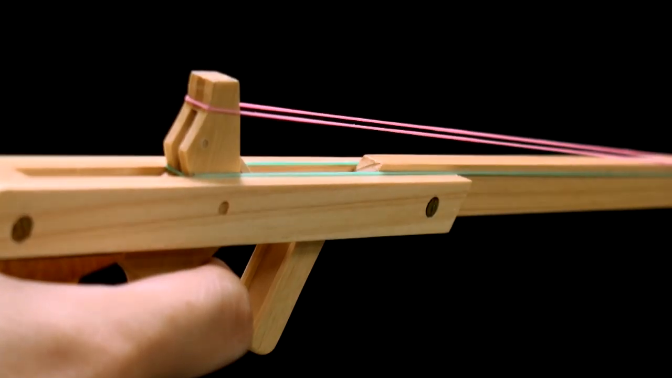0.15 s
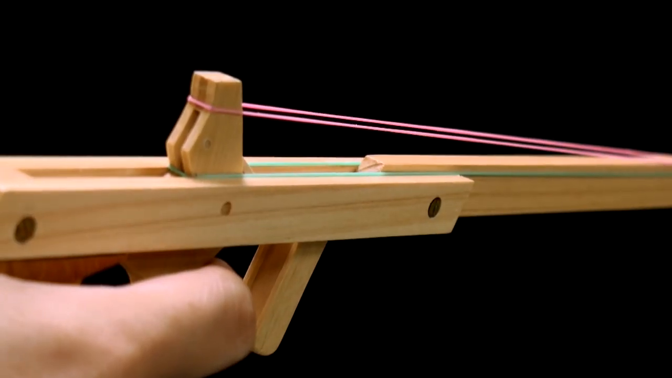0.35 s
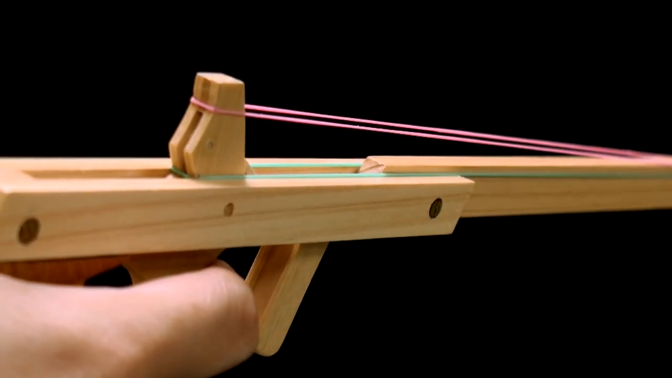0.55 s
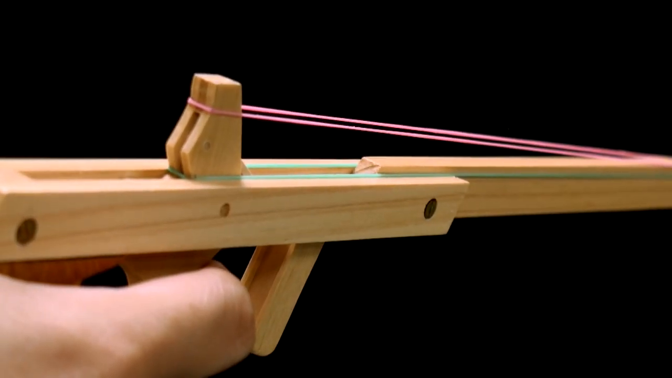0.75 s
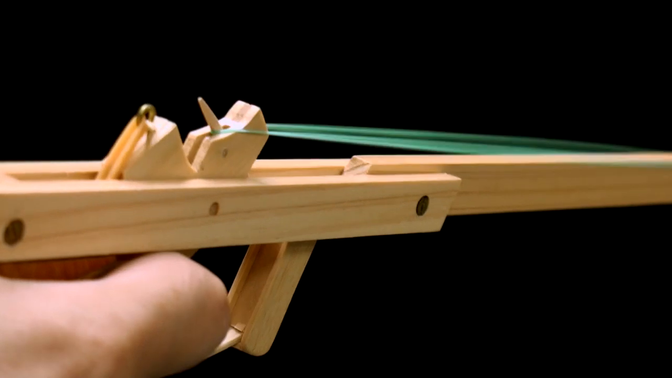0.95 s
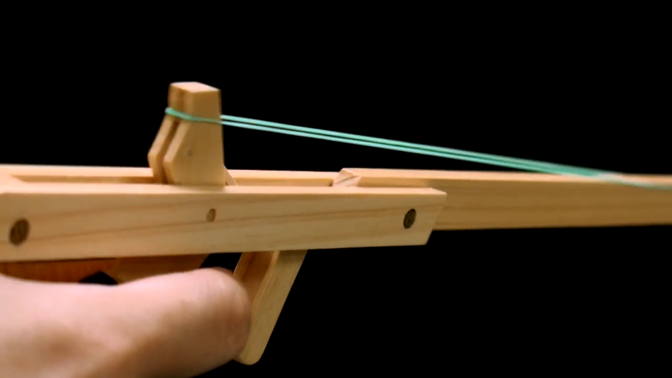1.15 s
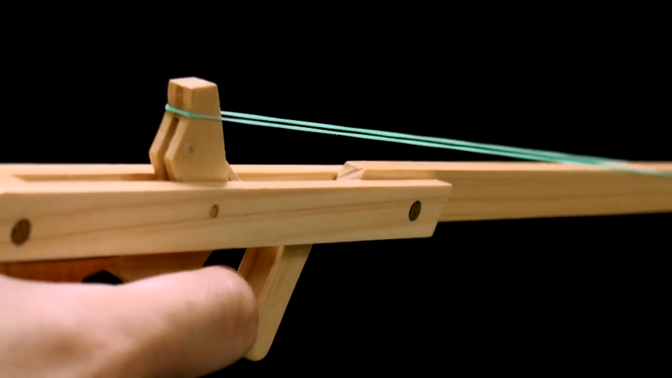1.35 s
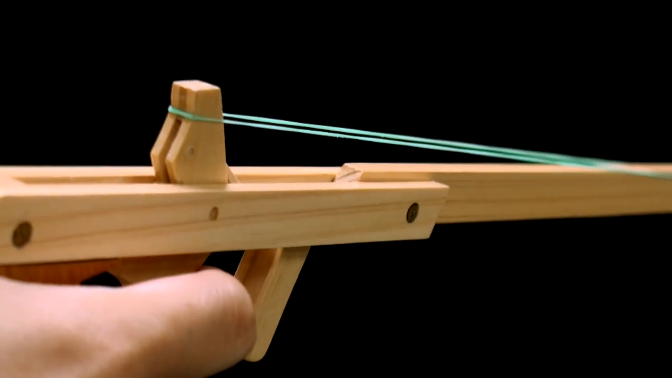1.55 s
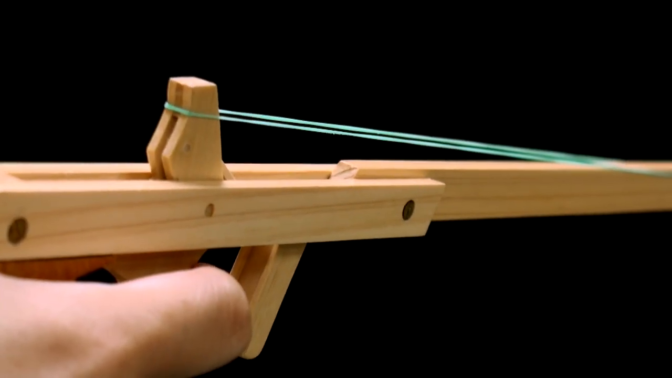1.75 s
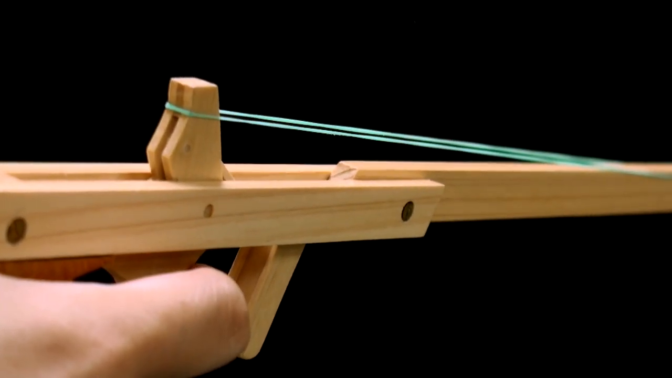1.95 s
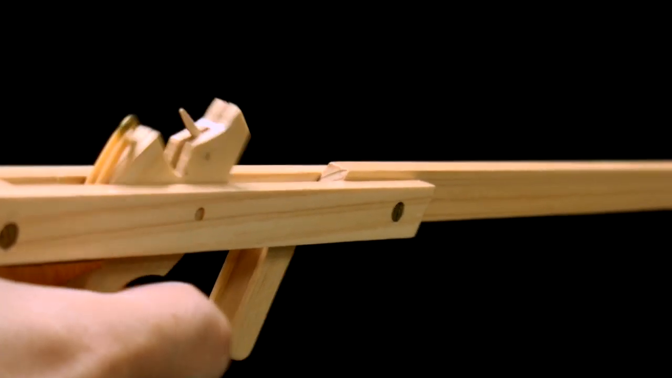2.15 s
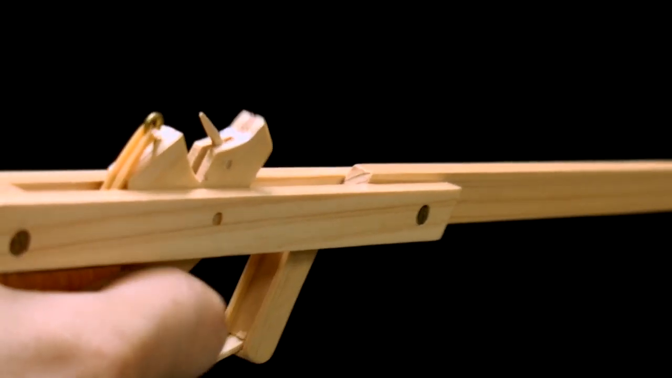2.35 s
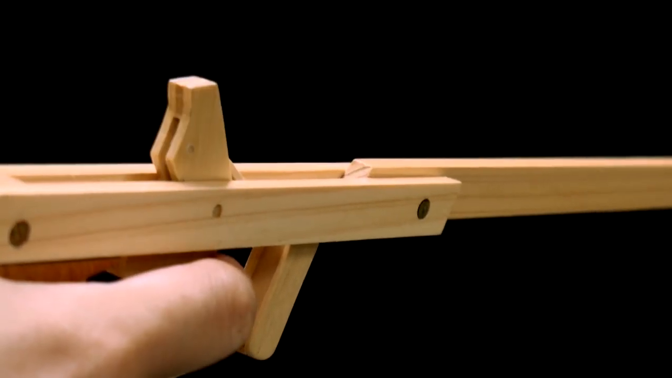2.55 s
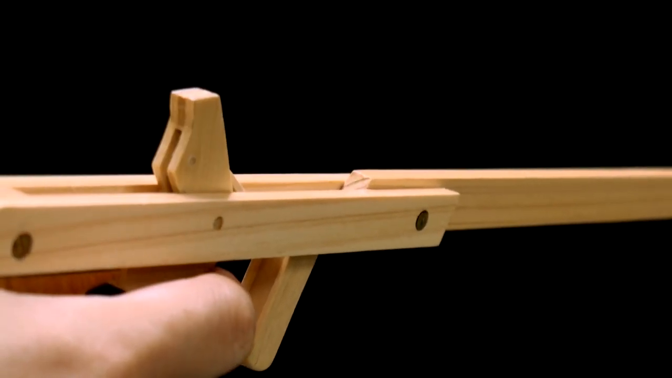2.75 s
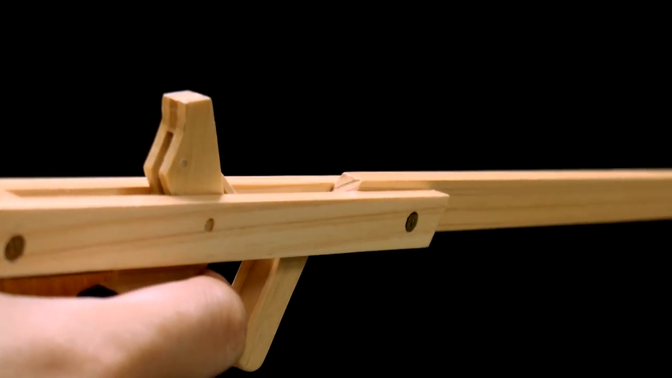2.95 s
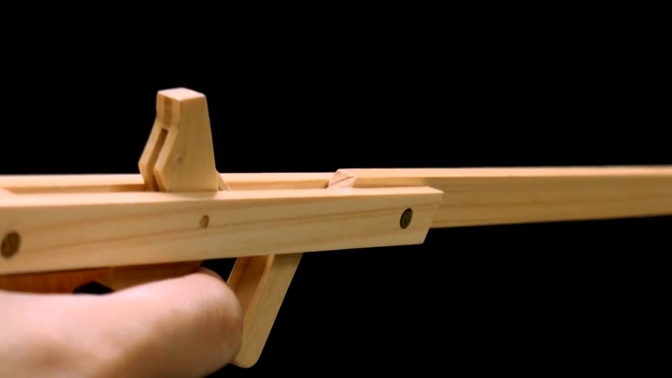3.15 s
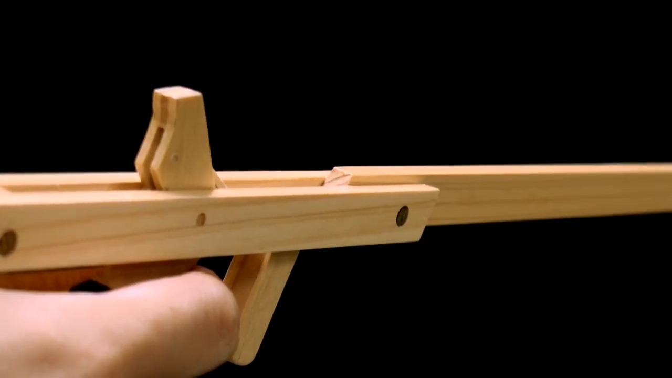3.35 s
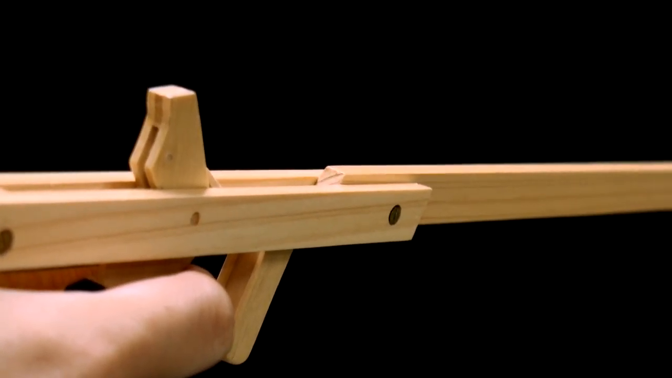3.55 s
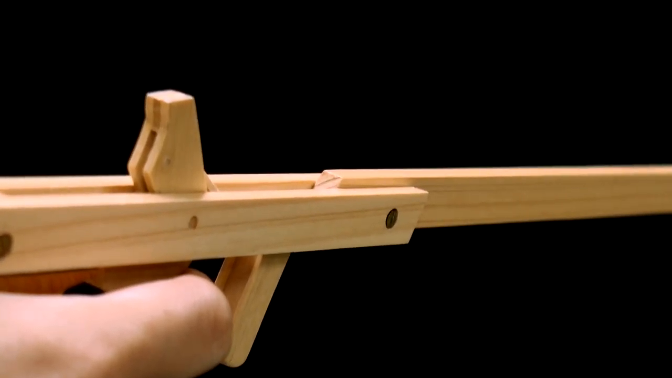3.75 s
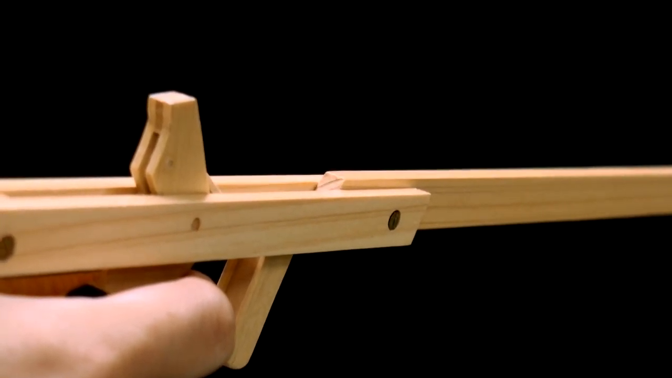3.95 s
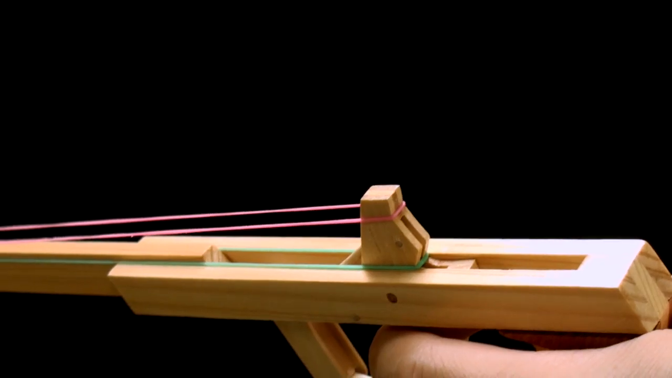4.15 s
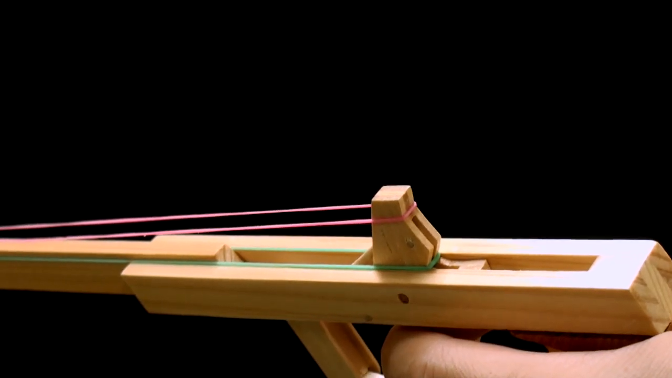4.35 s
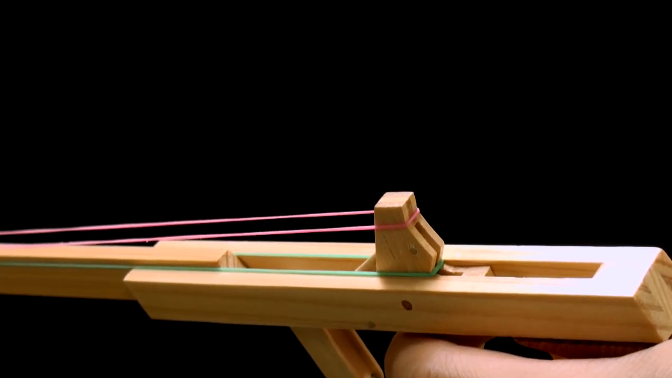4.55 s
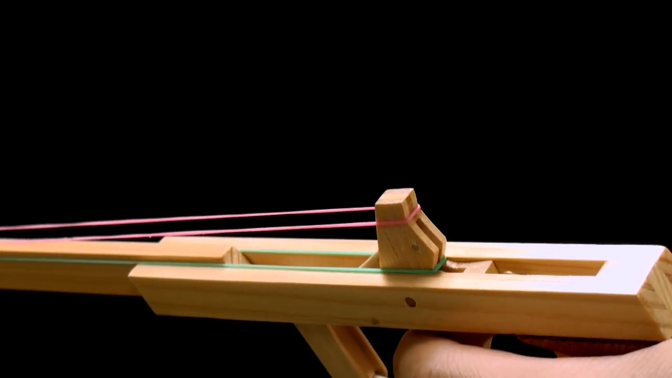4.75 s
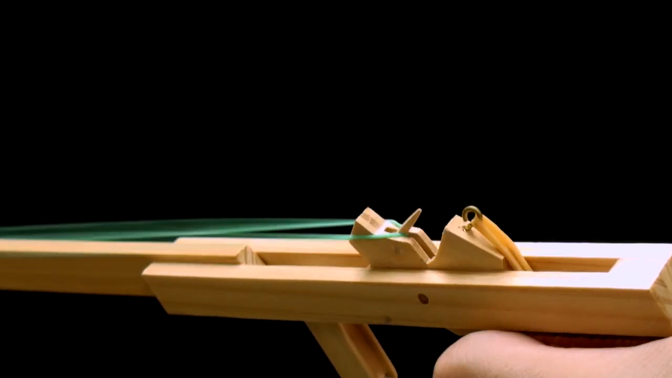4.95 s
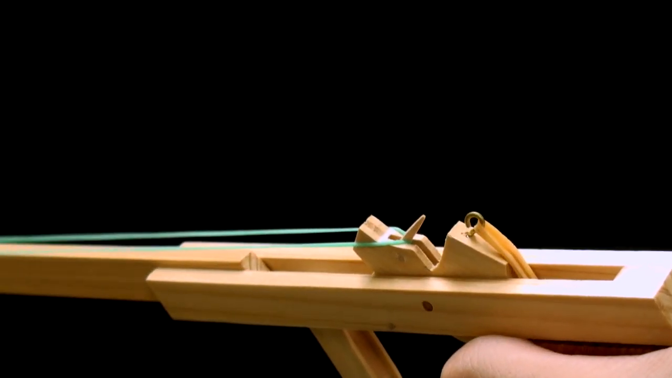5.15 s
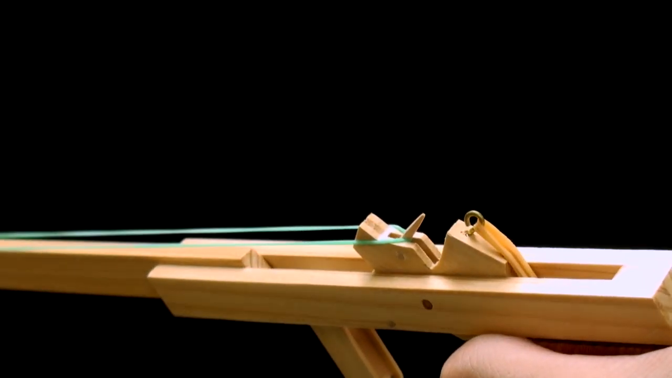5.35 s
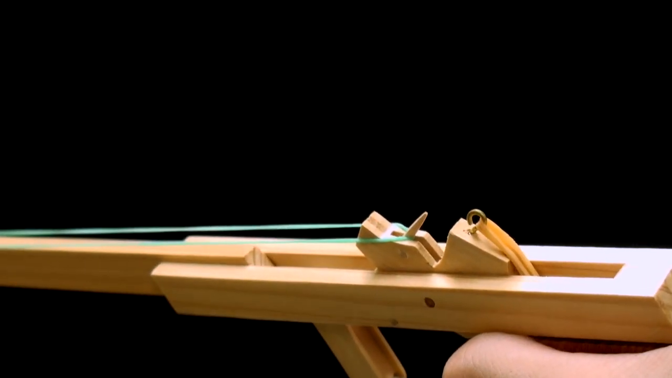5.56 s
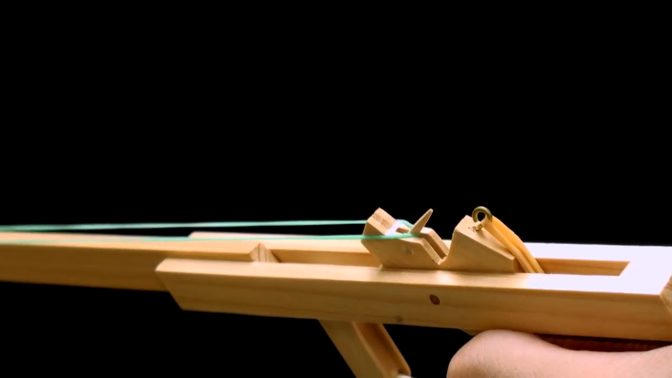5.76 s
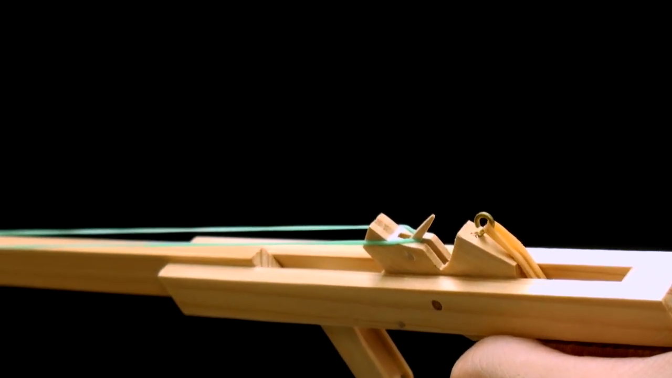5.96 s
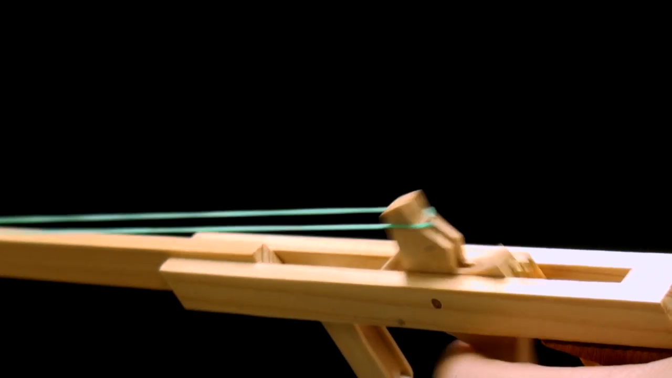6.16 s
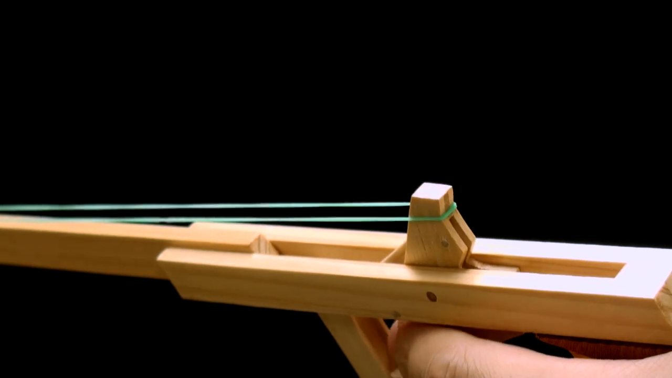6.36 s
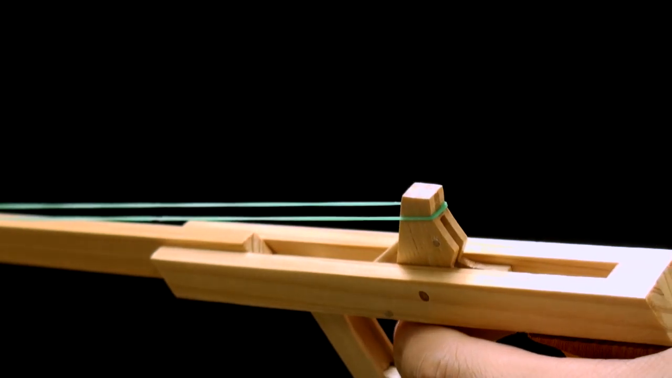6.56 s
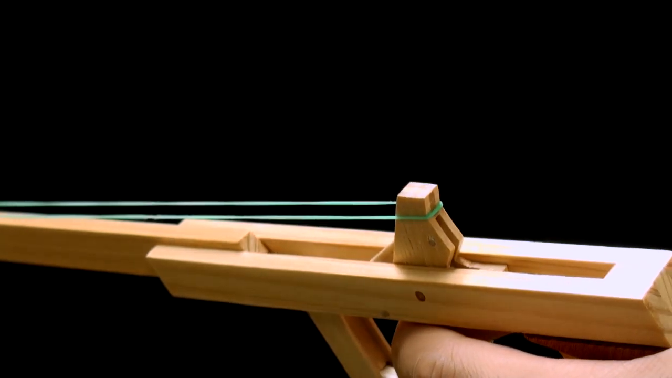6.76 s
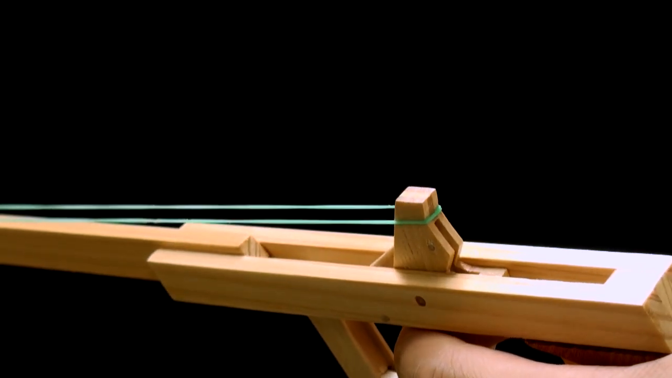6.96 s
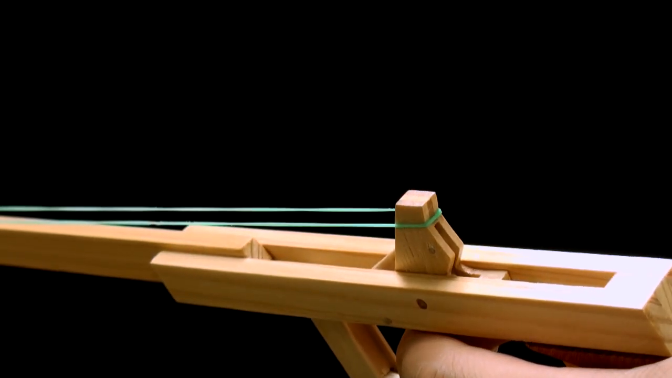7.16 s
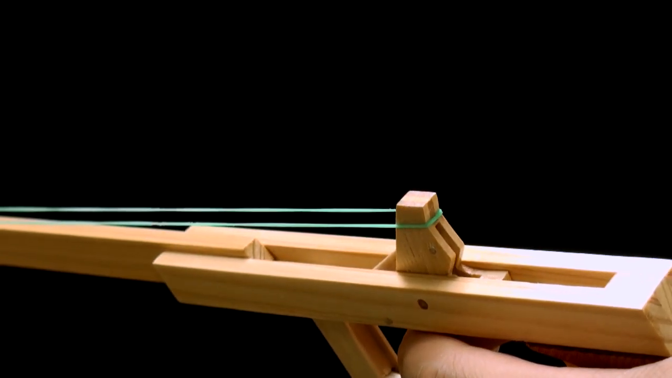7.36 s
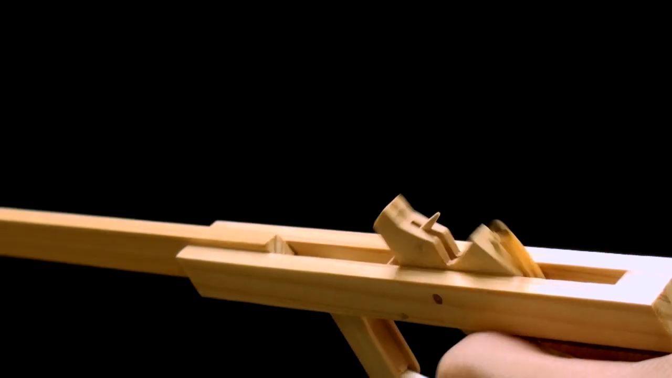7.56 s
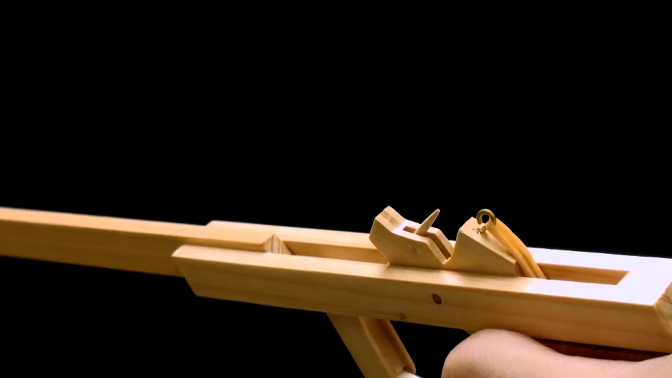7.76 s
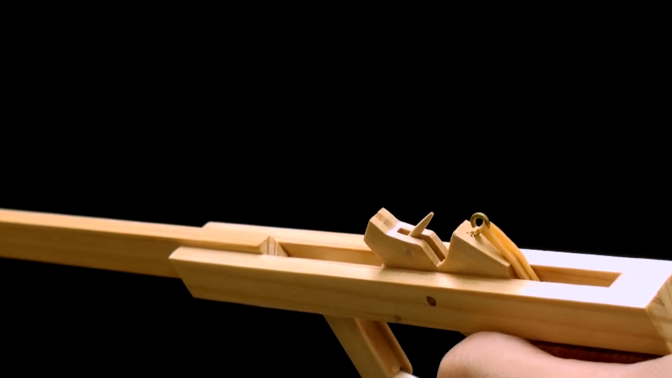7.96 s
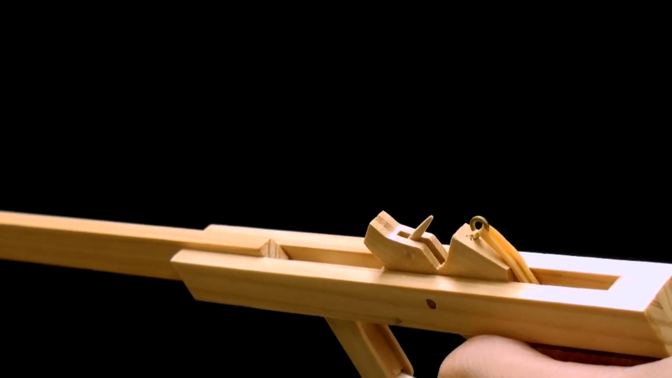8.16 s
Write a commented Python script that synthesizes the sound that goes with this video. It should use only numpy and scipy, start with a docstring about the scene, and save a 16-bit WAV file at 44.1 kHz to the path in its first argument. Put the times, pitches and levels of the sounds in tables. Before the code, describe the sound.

Four hard wooden clacks from a rubber band gun, with light ticks and brief slides, echo shortly over very quiet hiss and insects.

```python
"""A bare room on a summer night: a wooden rubber band gun is fired four times before two microphones.
Trigger and catch slide and tick, the freed band whips along the rail as fading noise, and the hook's slam
rings the modes of the gun. Echoes and a dense tail answer; a quick limiter flattens each slam.
Outside, narrow bands of noise make one chirping cricket and a far chorus of insects.
Beneath lie a hum of four unsteady tones, far traffic as deep noise, and the hiss of the microphones."""
import sys
import numpy as np
from scipy import signal
from scipy.fft import rfft, irfft, next_fast_len
from scipy.io import wavfile
from scipy.ndimage import uniform_filter1d, minimum_filter1d

SR = 44100
rng = np.random.default_rng(int(sys.argv[2]) if len(sys.argv) > 2 else 0)


def dump(signal):
    """Clip the signal to [-1, 1] and save it as 16-bit WAV at the path in sys.argv[1]."""
    limited = np.clip(np.atleast_2d(signal).T, -1, 1)
    pcm = np.round(limited * 32767).astype(np.int16)
    wavfile.write(sys.argv[1], SR, pcm)


N = 362502  # length in samples


def gain_of(db):
    """Turns decibels into an amplitude factor."""
    return 10 ** (np.asarray(db) / 20)


def evened(x):
    """Scales a sound to an rms of one."""
    return x / np.sqrt(np.mean(x ** 2) + 1e-20)


def read(points, hz):
    """Reads a table between its points along a log-frequency axis."""
    point_hz, value = np.transpose(points)
    return np.interp(np.log(hz + 1), np.log(point_hz + 1), value)


def add(mix, start_s, sound):
    """Mixes a sound in at its start time, cut off where the mix ends."""
    part = mix[round(start_s * SR):][:len(sound)]
    part += sound[:len(part)]


def coloured(x, points):
    """Weights the spectrum along the last axis by a table of (pitch_hz, level_db)."""
    length = x.shape[-1]
    size = next_fast_len(length)
    gain = gain_of(read(points, np.fft.rfftfreq(size, 1 / SR)))
    return irfft(rfft(x, size) * gain, size)[..., :length]


def paired(a, b, same):
    """Left is a; right blends a and b, with the left-right likeness set over frequency."""
    likeness = np.clip(read(same, np.fft.rfftfreq(len(a), 1 / SR)), -1, 1)
    right = likeness * rfft(a) + np.sqrt(1 - likeness ** 2) * rfft(b)
    return np.array([a, irfft(right, len(a))])


def rubbing(length, colour):
    """Friction noise: uneven slips, coloured by what rubs, at an rms of one."""
    slips = rng.standard_normal(length) * rng.exponential(1, length)
    return evened(coloured(slips, colour))


def lean(x, low_hz=160):
    """Cuts the deep bass, which so small a thing hardly sends out."""
    return signal.sosfilt(signal.butter(4, low_hz, "high", fs=SR, output="sos"), x)


# resonances of the wooden gun: pitch_hz, level_db [dB], t60_s [s to fall by 60 dB]
GUN_MODES = [(244, -1, 0.044), (401, -3, 0.082), (486, 2, 0.046), (824, 2.5, 0.0058), (1055, 3, 0.019),
             (1347, 8.5, 0.0096), (1964, -4.5, 0.045), (2040, 8.5, 0.0029), (3190, 8, 0.0037),
             (4010, 2, 0.0092), (4540, 1.5, 0.0022), (5230, 4, 0.014), (6560, 5, 0.00091),
             (8600, 1.4, 0.0012), (10440, 3, 0.0038), (12600, 0, 0.00044)]
MODE_HZ = np.transpose(GUN_MODES)[0]


def favoured(pitch_hz, favour_db, reach_oct):
    """A blow at one spot drives the modes around a favoured pitch more: extra dB for each mode."""
    return favour_db * np.exp(-(np.log2(MODE_HZ / pitch_hz) / reach_oct) ** 2)


def blow(drive_db, contact_s):
    """A fading burst of rebounds rings the gun's damped modes; total energy is one."""
    length = 4096
    t, hz = np.arange(length) / SR, np.fft.fftfreq(length, 1 / SR)
    fade = np.exp(-t / contact_s)
    spectrum = rfft(rng.standard_normal(length) * fade)
    rebounds = irfft(spectrum / (abs(spectrum) + 1e-9))  # flat spectrum: favours no pitch
    onset = np.minimum(t / contact_s * 4 + 0.26, 1)
    contact = rebounds * np.sqrt(fade) * onset

    power = 1e-8  # a floor far below the modes
    for db, (mode_hz, mode_db, t60_s) in zip(drive_db, GUN_MODES):
        half_width_hz = np.log(1000) / (2 * np.pi * t60_s)
        skirt = (hz ** 2 - mode_hz ** 2) / (2 * half_width_hz * abs(hz) + 1e-9)
        power = power + gain_of(2 * (db + mode_db)) / (1 + skirt ** 2)
    log_gain = np.log(power) / 2
    phase = -signal.hilbert(log_gain).imag  # minimum phase: the ring starts at the blow
    ring = np.fft.ifft(np.exp(log_gain + 1j * phase)).real

    sound = np.convolve(contact, ring[:length // 2])[:length]
    return sound / np.linalg.norm(sound)


# the four shots: freed_s [s, band let go], whip_db [dB], slam_s [s, hook lands], slam_db [dB],
# bright_db [dB per octave], hook_hz, hook_favour_db [dB], stock_hz, stock_favour_db [dB]
SHOTS = [(0.893, -36, 0.9357, 17, 1.25, 2090, 6, 480, 5),
         (2.178, -37, 2.2263, 14.5, -1.13, 1090, 5, 430, 4.5),
         (4.947, -35, 4.980, 15.5, -0.32, 2300, 4.5, 240, -2.5),
         (7.592, -32.5, 7.624, 11.5, -0.16, 4470, 7.5, 240, -7)]
# sound of the whipping band: pitch_hz, level_db
WHIP_COLOUR = [(200, -20), (600, -4), (2000, 1), (4000, 6.5), (8000, 3), (12000, -2), (15000, -1.5)]
# how hard a slam drives the modes: pitch_hz, level_db
SLAM_DRIVE = [(225, -5.5), (450, 2), (900, 0.46), (3200, 1.8), (4400, 5.5), (10000, 2)]
WHIP_FADE_DB_PER_S = 224


def gun():
    """The freed band whips along the rail as fading noise until the hook slams home, dry."""
    out = np.zeros(N)
    for freed_s, whip_db, slam_s, slam_db, bright_db, *favours in SHOTS:
        t = np.arange(0, slam_s - freed_s, 1 / SR)
        whip = rubbing(len(t), WHIP_COLOUR)
        add(out, freed_s, gain_of(whip_db - WHIP_FADE_DB_PER_S * t) * whip)

        drive_db = read(SLAM_DRIVE, MODE_HZ) + bright_db * np.log2(MODE_HZ / 2000)
        for pitch_hz, favour_db in np.reshape(favours, (2, 2)):  # the hook, then the stock
            drive_db = drive_db + favoured(pitch_hz, favour_db, reach_oct=0.28)
        add(out, slam_s, gain_of(slam_db) * blow(drive_db, contact_s=0.0062))
    return lean(out)


# the catch ticks and rebounds: start_s, level_db, pitch_hz [favoured], favour_db [dB]
TICKS = [(0.856, -23.5, 5500, 18), (0.8777, -15.5, 10200, 16), (0.895, -5.5, 8000, 3), (.8970, -9, 5200, 0),
         (1.1738, -12.5, 10300, 13), (2.149, -15.5, 9640, 26), (2.1791, -1.5, 10300, 17),
         (2.1821, -3.5, 3900, 18.5), (2.611, -33, 6500, 0), (4.948, -9, 9050, 10), (4.9522, -7.5, 4500, -2),
         (6.2414, -13, 9700, 14), (6.2458, -20, 5200, 12), (6.251, -21, 5400, 17),
         (6.2562, -21.5, 1850, 42), (6.26, -19, 7000, 3), (7.4740, -37, 7000, 1), (7.5900, -11.5, 8900, 3),
         (7.5936, -2.5, 5250, 17.5), (8.0930, -34, 9500, 6), (8.1000, -29, 2190, 24),
         (8.1050, -26, 8600, 5)]


def ticks():
    """Light blows of the catch ring the same modes, but hardly stir the low ones."""
    out = np.zeros(N)
    light_db = read([(400, -7.5), (1200, -7.5), (2500, -8), (6000, 2.0)], MODE_HZ)
    for start_s, level_db, pitch_hz, favour_db in TICKS:
        drive_db = light_db + favoured(pitch_hz, favour_db, reach_oct=0.16)
        add(out, start_s, gain_of(level_db) * blow(drive_db, contact_s=0.0023))
    return out


# wood slides on wood: start_s, end_s, level_db [reached at the end]
SLIDES = [(0.798, 0.894, -54.5), (2.098, 2.174, -50), (2.463, 2.496, -48.5), (4.9, 4.947, -50),
          (6.139, 6.232, -52), (7.499, 7.589, -53), (8.06, 8.15, -61.5)]
# sound of wood on wood: pitch_hz, level_db
SLIDE_COLOUR = [(1500, -29), (3500, -1), (6500, 2), (8500, 2), (10500, -1), (13500, -8), (15000, -16)]
SLIDE_RISE_DB, SLIDE_BEND = 22, 1.44  # a stroke swells from this far below, quickly at first


def slides():
    """Each sliding stroke is friction noise that swells to its end."""
    out = np.zeros(N)
    for start_s, end_s, level_db in SLIDES:
        left = np.linspace(1, 0, int((end_s - start_s) * SR))  # share of the stroke still to go
        swell_db = level_db - SLIDE_RISE_DB * left ** SLIDE_BEND
        add(out, start_s, gain_of(swell_db) * rubbing(len(left), SLIDE_COLOUR))
    return out


def catch():
    """Slides and ticks of trigger and catch, dry."""
    return lean(ticks() + slides())


# decay of the bare room: pitch_hz, t60_s [s to fall by 60 dB]
ROOM_DECAY = [(150, 0.36), (400, 0.42), (1500, 0.41), (3000, 0.39), (7000, 0.31), (12000, 0.23)]
# the next room, which answers longer: pitch_hz, level_db
HALL = [(150, -52), (600, -28.5), (1100, -26), (2100, -26.5), (3300, -33), (5000, -35.5), (8000, -40)]
# tail of the room at both microphones: pitch_hz, likeness [-1 to 1]
ROOM_SAME = [(150, 0.99), (400, 0.84), (1400, 0.66), (3500, 0.72), (7000, 0.86), (10000, 0.62),
             (12500, 0.072)]
# walls swallow treble at each bounce: pitch_hz, level_db
TAIL_COLOUR = [(150, 10.5), (1000, -4), (4000, -6), (8000, -3.5), (13000, -5.5)]
# early echoes off the table and near walls: delay_s, level_db
ECHOES = [(.0040, -10), (.0085, -12), (.0125, -12), (.0170, -12)]


def room(x, tail_db):
    """Direct sound, a few duller early echoes and a dense noise tail that dies band by band."""
    noise = paired(*rng.standard_normal((2, SR)), ROOM_SAME)
    hz, t, bands = signal.stft(noise, SR, nperseg=256)
    room_decay = gain_of(-60 * t / read(ROOM_DECAY, hz)[:, None])
    hall_decay = gain_of(read(HALL, hz)[:, None] - 60 * t / 1.2)  # falls by 60 dB in 1.2 s
    tail = signal.istft(bands * (room_decay + hall_decay), SR, nperseg=256)[1][:, :SR]
    tail = coloured(tail, TAIL_COLOUR)
    tail *= 1 - np.exp(-np.arange(SR) / SR / .004)  # the echoes thicken over the first moments
    tail *= np.hanning(2 * SR)[SR:] ** .5  # nothing is left after a second
    tail = gain_of(tail_db) * tail / np.linalg.norm(tail[0])
    tail *= gain_of([[-.6], [.6]])  # left, right

    early = np.zeros(SR)
    for delay_s, level_db in ECHOES:
        add(early, delay_s, gain_of(level_db) * np.array([.25, .5, .25]))  # smoothed, so duller
    early[0] = 1  # the direct sound
    return signal.fftconvolve(x[None], early + tail, axes=1)[:, :N]


# one cricket outside: time_s, chirp_count [chirps sung so far]
CHIRPS = [(.07, 0), (3.64, 18), (4.3, 21), (5.93, 29), (8.3, 41)]
# band of the cricket's song: pitch_hz, level_db
CRICKET_BAND = [(3350, -45), (3480, -5), (3650, -7.5), (3800, -2), (3880, -1.5), (3980, -31)]


def cricket(level_db=-71, strokes_per_s=52, same=.55):
    """Wing strokes pulse a narrow band of noise and swell at each chirp, blurred by distance."""
    t = np.arange(N) / SR
    chirp = 0.34 + np.cos(np.pi * np.interp(t, *np.transpose(CHIRPS))) ** 2
    stroke = 1.4 + np.cos(np.pi * strokes_per_s * t) ** 2
    pulsed = rng.standard_normal((2, N)) * chirp * stroke
    both = coloured(paired(*pulsed, [(1, same), (SR, same)]), CRICKET_BAND)
    return gain_of(level_db) * evened(both) * gain_of([[.7], [-.7]])


# band of the insect chorus: pitch_hz, level_db
CHORUS_BAND = [(4800, -49), (5050, -13.5), (5250, -5.5), (5400, 2), (5700, 2), (5780, -2), (5840, -57)]


def chorus(level_db=-60, strokes_per_s=5000, same=.82):
    """Many far insects: overlapping random wing strokes fill one narrow band."""
    struck = rng.random((2, N)) < strokes_per_s / SR
    strokes = rng.standard_normal((2, N)) * struck
    both = coloured(paired(*strokes, [(1, same), (SR, same)]), CHORUS_BAND)
    return gain_of(level_db) * evened(both) * gain_of([[1.5], [-1.5]])


# tones of the hum: pitch_hz, level_db, waver_hz [how fast the level wavers]
HUM = [(73.3, -76.5, 7.8), (123, -74.5, 3), (242, -70.5, 6.3), (835, -75.5, 1.8)]


def hum():
    """Tones of steady pitch whose levels waver at random."""
    t, out = np.arange(N) / SR, np.zeros(N)
    for pitch_hz, level_db, waver_hz in HUM:
        smooth_samples = int(SR / max(waver_hz, .5))
        waver = evened(uniform_filter1d(rng.standard_normal(N), smooth_samples))
        tone = np.sqrt(2) * np.sin(2 * np.pi * (pitch_hz * t + rng.random()))
        out += gain_of(level_db + 2.4 * waver) * tone
    return out


# far traffic: time_s, level_db
RUMBLE = [(0, -73.5), (4.1, -79), (4.6, -74), (5.7, -75), (6.3, -67), (7.0, -70), (8.3, -75)]


def rumble():
    """Far traffic: a deep band of noise that swells and sinks."""
    drone = coloured(rng.standard_normal(N), [(18, -41), (32, -11), (48, -2.0), (62, -2), (85, -46)])
    level_db = np.interp(np.arange(N) / SR, *np.transpose(RUMBLE))
    return gain_of(level_db) * evened(drone)


# spectrum of the background noise: pitch_hz, level_db [dB per Hz, relative]
HISS = [(25, -5), (45, -16), (70, -7), (110, -2), (280, -1.5), (600, -1.5), (1000, -2.5), (2000, -6.5),
        (3200, -10.5), (4600, -13), (8000, -17), (12500, -18), (13000, -64)]
# background noise at both microphones: pitch_hz, likeness [-1 to 1]
HISS_SAME = [(60, .99), (130, 0.88), (290, 0.58), (640, 0.15), (1400, -0.054), (3100, -0.14), (12000, 0.32)]


def hiss(level_db=-58):
    """Steady noise of distant rumble and the two microphones, more alike in the bass."""
    noise = paired(*rng.standard_normal((2, N)), HISS_SAME)
    return gain_of(level_db) * evened(coloured(noise, HISS))


def scene():
    """The slams fill the room; the thin ticks beam forward and stir it less."""
    shots = room(gun(), tail_db=8)
    handling = room(catch(), tail_db=-5.5)
    outside = cricket() + chorus() + rumble()
    return shots + handling + outside + hum() + hiss()


# colour of the microphones: pitch_hz, level_db
MIC_COLOUR = [(30, 4.5), (13000, 1.66), (14300, -9), (15000, -30), (16000, -30)]
LIMIT_DB, LIMIT_SHARE = -19.5, 0.98  # threshold, and the share of the excess taken off
LOOK_AHEAD_S, RECOVER_DB_PER_S = 0.0015, 1000.
EDGE_HZ = 16400  # top of the band


def record(dry):
    """A limiter looks a moment ahead and lets go fast; then microphone colour and band limit."""
    power = abs(uniform_filter1d((dry ** 2).mean(0), int(.005 * SR)))
    power_db = 10 * np.log10(power + 1e-12)
    fall_db = np.arange(N) * RECOVER_DB_PER_S / SR
    held_db = np.maximum.accumulate(power_db + fall_db) - fall_db  # peaks sink at the recovery rate
    over_db = np.maximum(held_db - LIMIT_DB, 0)
    over_db = -minimum_filter1d(-over_db, int(LOOK_AHEAD_S * SR) + 1)  # running maximum
    cut_db = LIMIT_SHARE * uniform_filter1d(over_db, int(.002 * SR))
    limited = coloured(dry / gain_of(cut_db), MIC_COLOUR)
    band_limit = signal.firwin(511, EDGE_HZ, window=("kaiser", 9), fs=SR)
    return signal.oaconvolve(limited, band_limit[None], "same")


dry = scene()
out = record(dry)
dump(out)
```